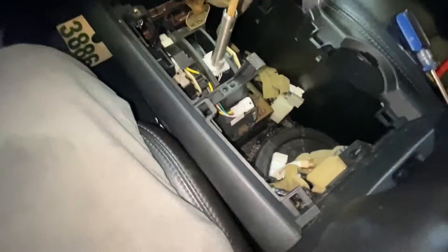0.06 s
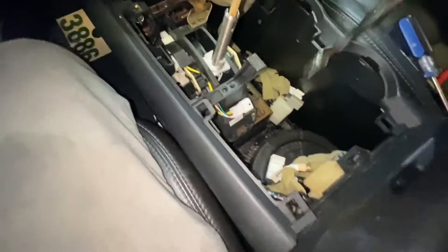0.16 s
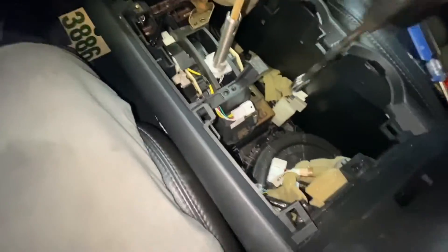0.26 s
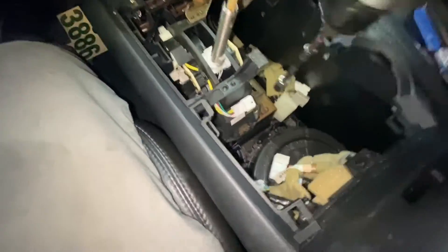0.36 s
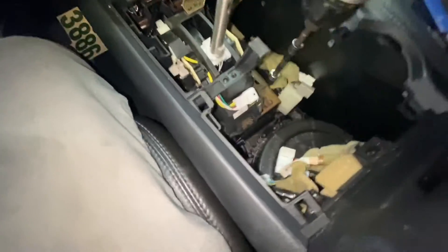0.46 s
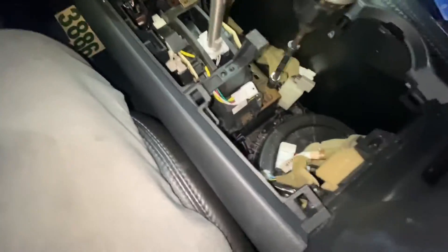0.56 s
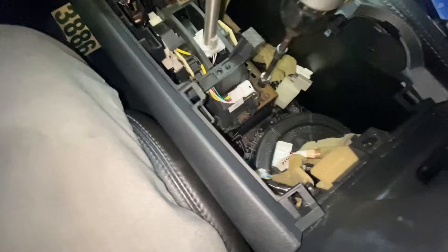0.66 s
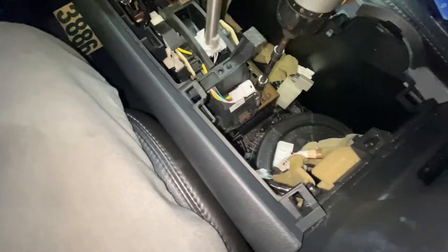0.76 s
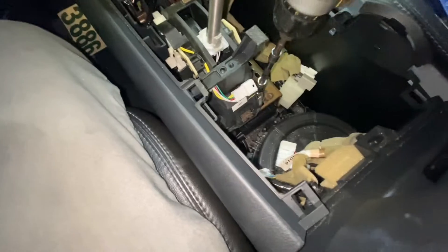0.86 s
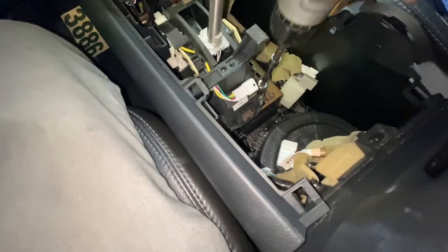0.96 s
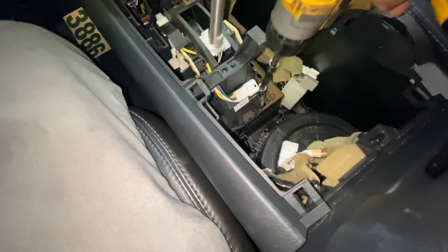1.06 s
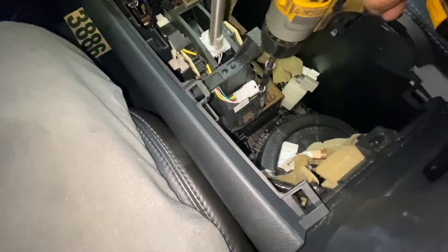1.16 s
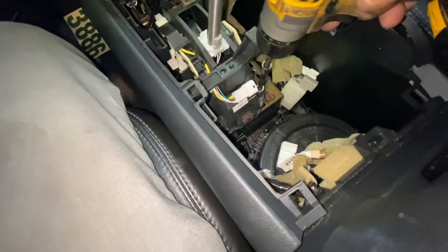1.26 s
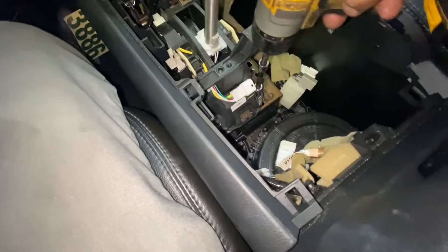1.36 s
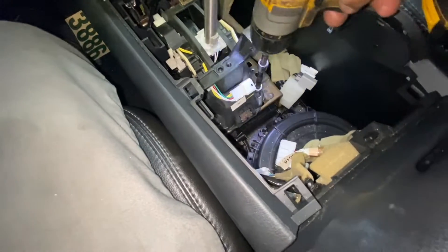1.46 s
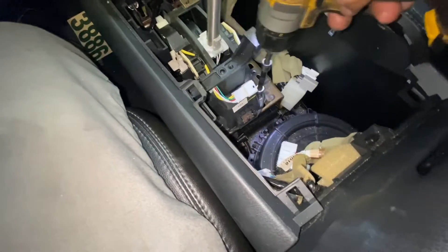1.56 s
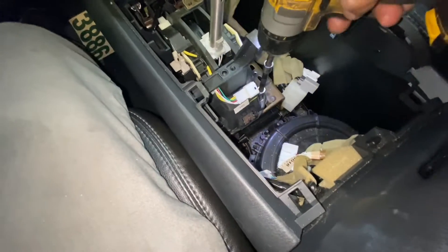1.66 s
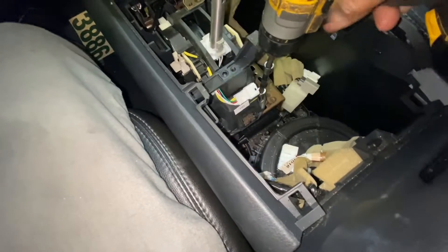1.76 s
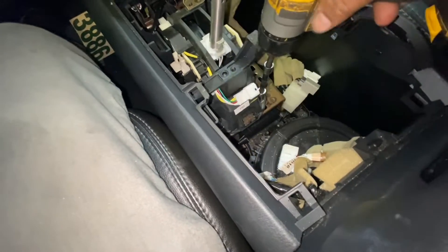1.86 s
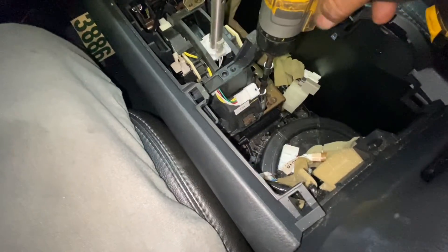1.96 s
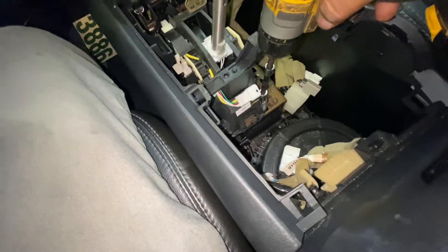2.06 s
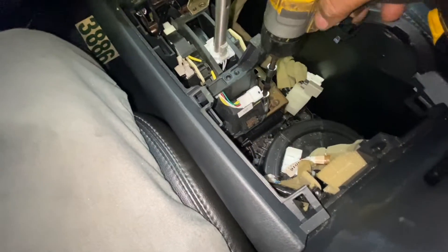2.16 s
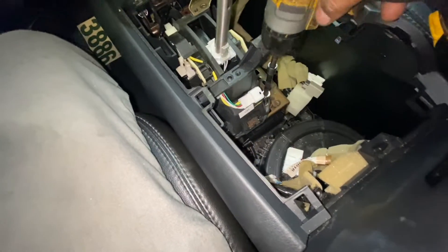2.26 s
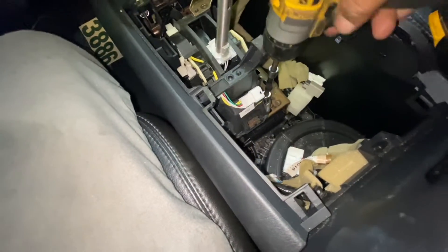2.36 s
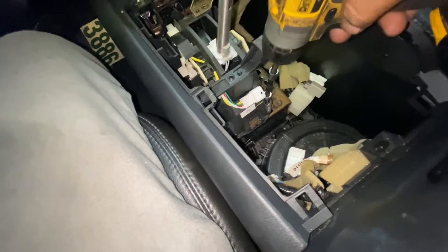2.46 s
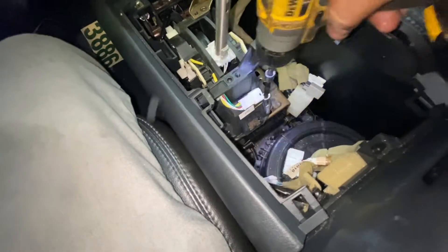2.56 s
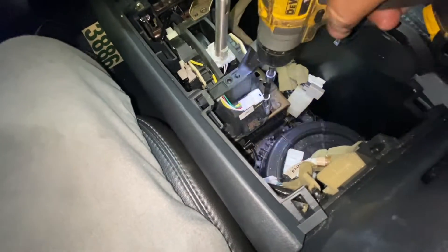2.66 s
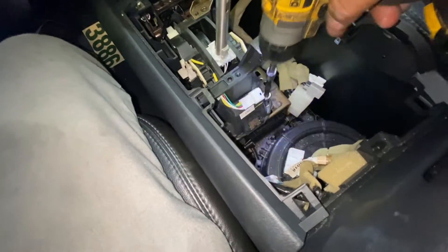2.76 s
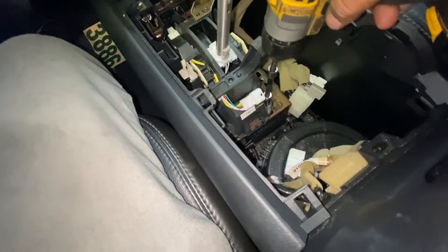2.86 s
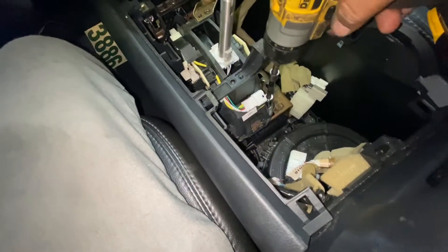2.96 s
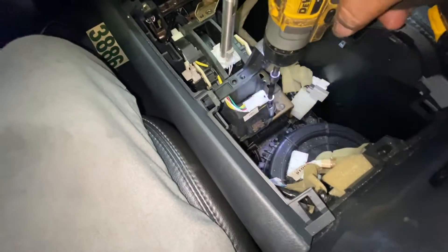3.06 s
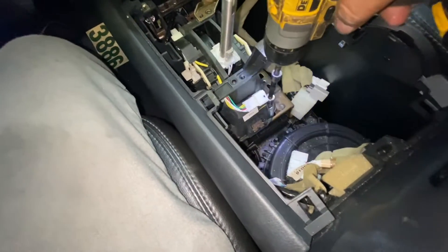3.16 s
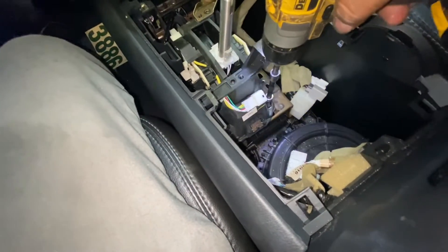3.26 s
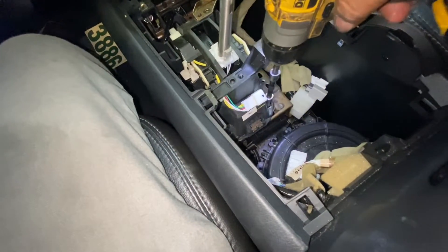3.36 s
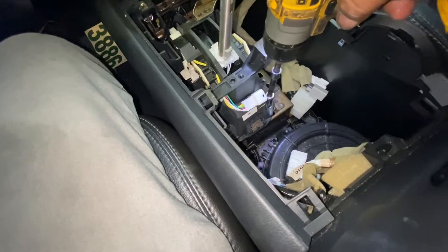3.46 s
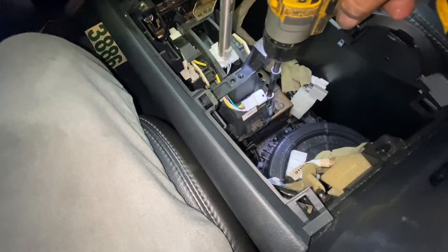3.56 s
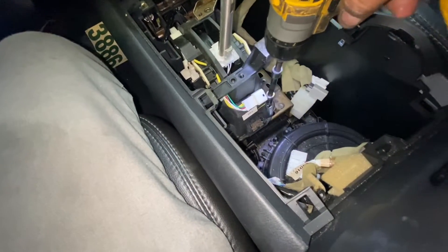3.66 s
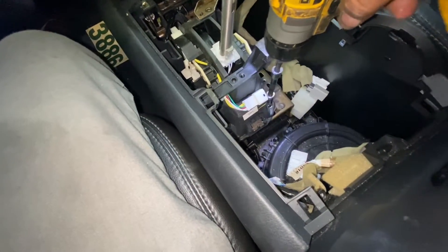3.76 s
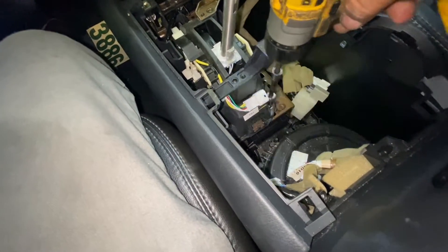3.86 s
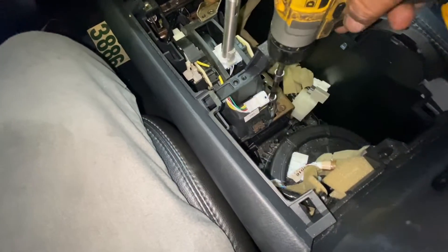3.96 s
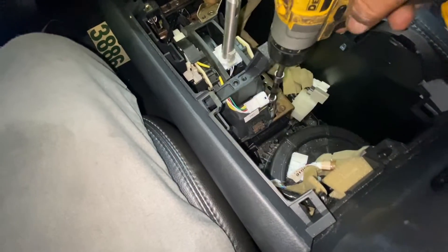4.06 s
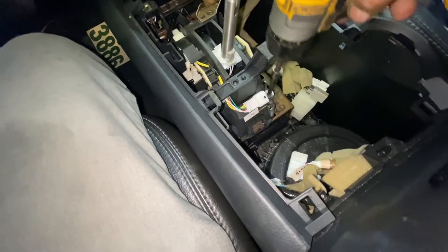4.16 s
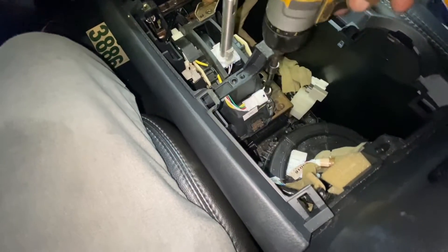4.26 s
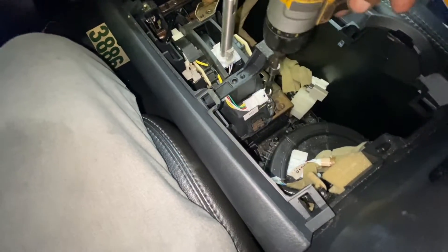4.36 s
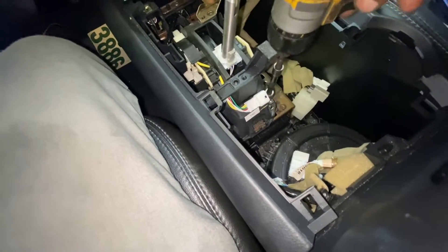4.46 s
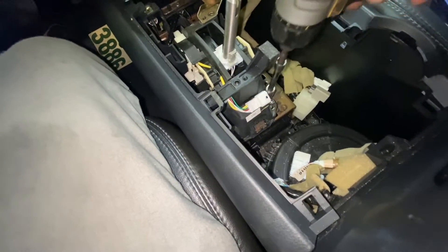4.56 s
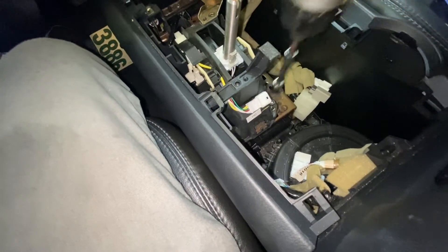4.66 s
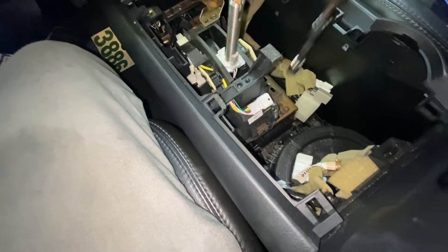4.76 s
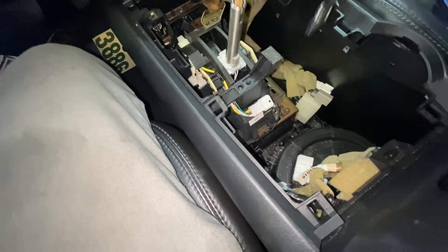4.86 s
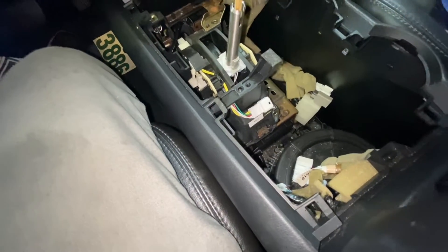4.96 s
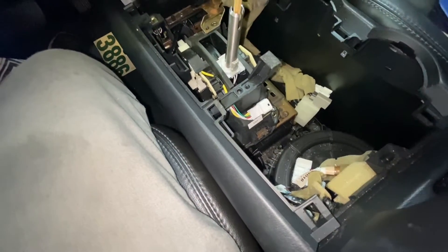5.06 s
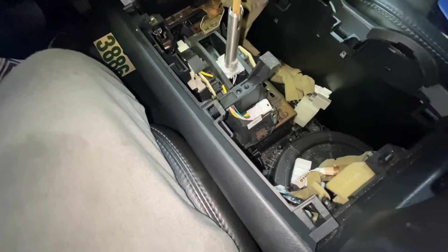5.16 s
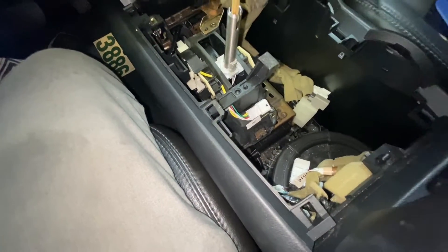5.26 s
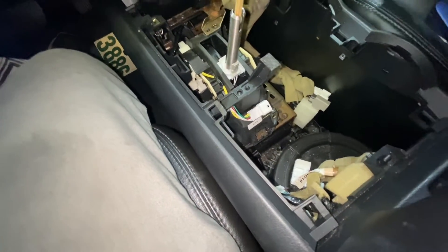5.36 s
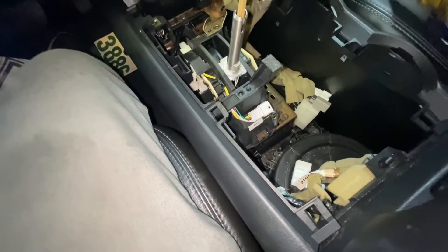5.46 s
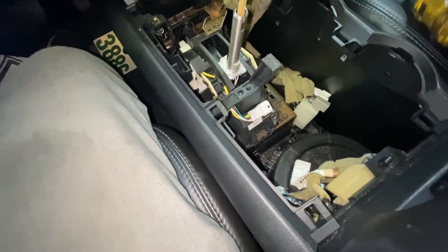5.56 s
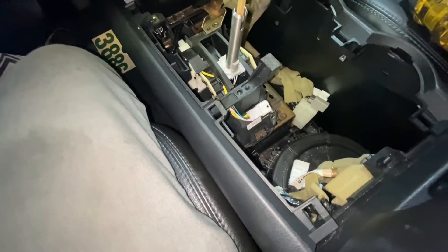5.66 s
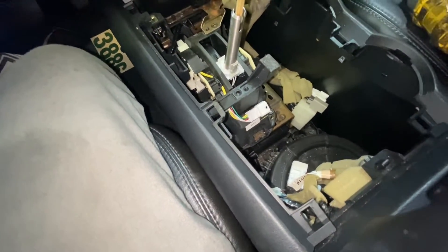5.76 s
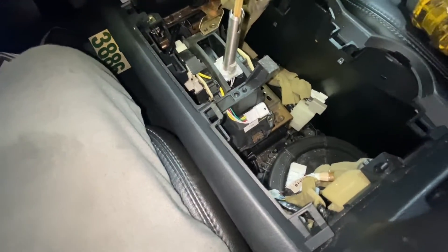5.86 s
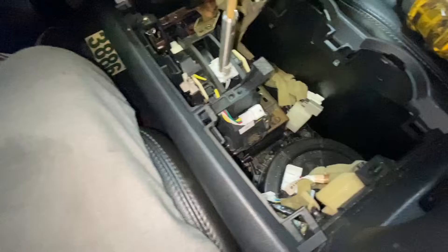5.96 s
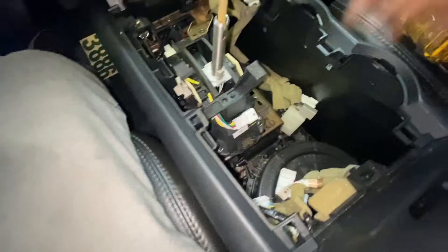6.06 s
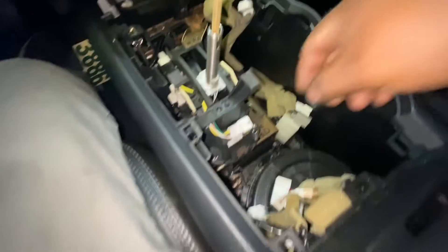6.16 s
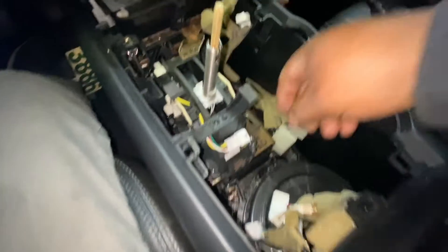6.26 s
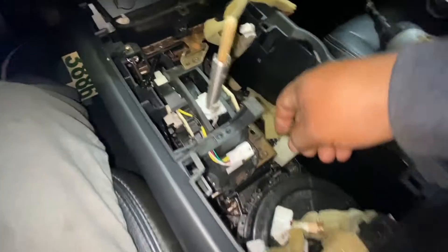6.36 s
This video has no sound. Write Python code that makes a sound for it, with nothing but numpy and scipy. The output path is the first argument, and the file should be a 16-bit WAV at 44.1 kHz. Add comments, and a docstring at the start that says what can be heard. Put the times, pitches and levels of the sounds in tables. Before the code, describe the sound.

A cordless impact driver clinks onto a bolt, rattles in two short bursts, then whines as it spins the bolt out inside a car.

```python
"""Inside a dead-sounding car cabin, close to the opened centre console, a cordless impact driver undoes
a bolt. The socket clinks onto the head, the hammer rattles in two bursts, then the motor
whines and spins the loose bolt out. The console thuds under the tool and the car's body booms;
small taps and the rustle of sliding clothes fill the pauses."""
import sys
import numpy as np
from scipy import signal
from scipy.fft import rfft, irfft
from scipy.io import wavfile
from scipy.ndimage import uniform_filter1d

SR = 44100
rng = np.random.default_rng(int(sys.argv[2]) if len(sys.argv) > 2 else 0)


def file_out(sig):
    """Save sig as 16-bit WAV at sys.argv[1]."""
    # one column per channel
    cols = np.atleast_2d(sig).T
    # limit, then scale
    lim = np.clip(cols, -1, 1)
    pcm = np.round(lim * 32767).astype(np.int16)
    wavfile.write(sys.argv[1], SR, pcm)


N = 283122
TIME, FREQS = np.arange(N) / SR, np.fft.rfftfreq(N, 1 / SR)

# Table levels are relative: each layer adds its own trim. Pan is left minus right.
# trigger pulls: start/s, release/s, top speed/(turns/s), gear level/dB, console shake/dB
PULLS = [(1.47, 1.665, 220, -37.5, -25), (2.49, 2.748, 232, -35.5, -29), (3.025, 3.811, 268.2, -28, -23.5)]
# the loose bolt jumps its last thread once a turn: t/s, grind/dB, thud/dB, thud centre/Hz
SKIPS = [(3.648, -24, -10.5, 300), (3.722, -27, -13, 200), (3.797, -24.5, -12, 182)]
# the tool bumps the console: t/s, level/dB, centre/Hz
THUDS = [(0.067, -37, 280), (0.993, -13.5, 293), (1.034, -10, 247), (1.052, -22.5, 170),
         (1.143, -26, 179.6), (1.296, -43, 255), (1.378, -34.5, 300), (1.45, -6.5, 258), (1.456, -5.5, 185),
         (1.91, -34.5, 198), (2.16, -37.5, 187), (2.294, -24.5, 258), (2.326, -25, 150), (2.533, -13, 238),
         (2.744, -26, 125), (2.874, -29.5, 123), (3.632, -12.5, 357), (3.975, -31, 130),
         (4.149, -25.5, 585), (4.466, -44.5, 494), (5.272, -61, 560), (5.588, -29.5, 550),
         (5.596, -40, 110), (5.775, -32.5, 150), (5.81, -37.5, 150), (6.368, -40, 280)]
# sleeves and trousers slide: start/s, peak/s, end/s, cloth level/dB, rub on the console/dB
RUSTLES = [(-0.5, 0.133, 0.86, -53, -46), (0.52, 0.72, 1.65, -69.5, -54.5), (0.936, 1.21, 1.43, -62, -59.5),
           (1.5, 1.8, 2.09, -68.5, -44), (2.05, 2.324, 2.43, -62.5, -44), (2.7, 2.919, 3.03, -66, -44),
           (3.926, 4.095, 4.32, -65, -47.5), (5.234, 5.484, 5.75, -60.5, -52),
           (5.75, 5.997, 6.31, -57.5, -54.5)]
# stereo image of the running tool: f/Hz, left-right correlation
TOOL_CORRELATION = [(60, 0.11), (130, 0.9), (290, 0.92), (640, 0.28), (1410, -0.31), (3100, 0.17),
                    (6820, 0.17), (15000, 1)]


def hammer():
    """Each blow cracks in the steel and kicks the console; all take a similar path to the ear."""
    # two bursts that gather pace, then slacken as the bolt gives; each: t/s, rate/(blows/s), level/dB
    bursts = [
        [(1.497, 54, -14), (1.53, 52, -12), (1.58, 118, -11), (1.63, 124, -11.5), (1.675, 57, -18)],
        [(2.501, 78, -20), (2.514, 82, -10), (2.55, 132, -9.5), (2.61, 143, -14.5), (2.651, 112, -16.5)],
    ]
    # colour of the crack: f/Hz, level/dB
    colour = [(200, -25.5), (450, -4.5), (700, -2), (1100, -1), (1600, 0.5), (2300, 2), (3400, -6.5),
              (5000, -1), (7000, -5.5), (10500, -5.5), (13000, -15), (15800, -13)]
    # its place in the image: f/Hz, pan/dB
    pan = [(60, -3.5), (110, -2.5), (200, 4.5), (380, -1), (700, 7), (1290, -0.5), (2380, 2.5), (4400, 5),
           (8120, 0.5), (15000, -1)]
    burst_tilts, lug_tilt = (-1.0, 0.86), 0.54  # dB/octave; the two lugs strike duller, then brighter
    out = np.zeros((2, N))
    path = rng.standard_normal((2, 2, 8192))
    for burst, burst_tilt in zip(bursts, burst_tilts):
        times, rate, force_db = np.transpose(burst)
        t = np.arange(times[0], times[-1], 1 / SR)
        blows_so_far = np.floor(np.cumsum(np.interp(t, times, rate)) / SR)
        for k, onset in enumerate(t[np.diff(blows_so_far, prepend=-1) > 0]):
            late, harder, brighter = rng.standard_normal(3)
            db = np.interp(onset, times, force_db) + .7 * harder
            tilt = burst_tilt - lug_tilt * (-1) ** k + 1.2 * brighter
            grit = path + 1.14 * rng.standard_normal(path.shape)
            crack = strike(colour, pan, grit, tilt, arch=0, contact_s=.00138, snap=0.31,
                           tail_db=1.0, tail_t60=0.064, tail_hz=5170)
            add(out, onset + .0004 * late, amp(db + 0.77) * crack)
            add(out, onset, amp(db - 8.0) * thud(250, focus_db=7.0, scatter=0.73))
    return out


def strike(colour, pan, grit, tilt, arch, contact_s, snap, tail_db, tail_t60, tail_hz):
    """One metal contact: a snap, a brief chatter and a duller cabin tail, through the ringing parts."""
    # resonances of socket, bracket and console hollow: f/Hz, width/Hz, boost/dB
    resonances = [(480, 30, 6), (835, 38, 4), (1100, 48, 4), (1302, 35, 3), (1640, 50, 5), (1850, 40, 3),
                  (2235, 55, 5), (2330, 70, 5), (2488, 50, 4), (2750, 45, 3), (4000, 70, 3), (5030, 180, 6),
                  (5800, 90, 3)]
    size = grit.shape[-1]
    t, hz = np.arange(size) / SR, np.fft.rfftfreq(size, 1 / SR)
    chatter = unit_rms(grit[0] * np.exp(-t / contact_s) * (1 - np.exp(-t / .0004)))
    click = unit_rms(np.array([signal.unit_impulse(size, 30), signal.unit_impulse(size, 8)]))
    tail = unit_rms(grit[1] * amp(-60 * t / tail_t60) * (1 - np.exp(-t / 0.0016)))
    blow = rfft(chatter + snap * click) + amp(tail_db) * rfft(tail) / (1 + 1j * hz / tail_hz)
    rings = 1 + sum((amp(db) - 1) / (1 + 2j * (hz - f) / width) for f, width, db in resonances)
    octaves = np.log2(np.clip(hz, 600, 10000) / 3000)
    eq = amp(curve(colour, hz) + tilt * octaves - arch * octaves ** 2) * pan_gains(curve(pan, hz))
    # minimum phase keeps the attack free of pre-ring
    log_eq = np.log(np.hstack([eq, eq[:, -2:0:-1]]))
    causal_eq = np.exp(np.conj(signal.hilbert(log_eq)))[:, :len(hz)]
    sound = irfft(blow * rings * causal_eq, size) * (1 - (t / t[-1]) ** 2)
    peak_power = uniform_filter1d((sound ** 2).mean(0), size=88).max()  # loudest 2 ms
    return sound / np.sqrt(peak_power)


def windings(drive_hz=4000):
    """As the trigger is eased in, the pulse-width drive makes the windings sing an octave pair."""
    # light squeezes ahead of the bursts: start/s, end/s, level/dB
    squeezes = [(1.362, 1.467, -46), (2.456, 2.491, -55)]
    gate = sum(ramp(start, end, db, db - 0.5) for start, end, db in squeezes)
    phase = 2 * np.pi * np.cumsum(drive_hz * (1 + .005 * drift(200))) / SR
    return gate * amp(2.5 * drift(60)) * (np.sin(2 * phase) + 0.62 * np.sin(phase))


def whine():
    """Fan and gear teeth sing at multiples of the shaft speed, filtered by the motor's housing."""
    # partials at full speed: multiple of shaft speed, level/dB
    partials = [(1, -37), (3, -45), (9, -46), (17, -49), (20, -37), (23, -41), (29, -44), (30, -44),
                (31, -36), (32, -43), (33, -44), (34, -38), (35, -43), (36, -43), (37, -35), (38, -41),
                (39, -33), (40, -35), (41, -46), (42, -38), (43, -40), (44, -43), (45, -43), (47, -44),
                (51, -44), (52, -40)]
    # what the housing lets through: f/Hz, level/dB
    housing = [(6200, 0), (7200, -12), (9300, -12), (9880, 0), (10700, 0), (11400, -8), (12200, -13),
               (14000, -11)]
    speed = shaft_speed()
    turns = np.cumsum(speed * (1 + .0009 * drift(70))) / SR
    out = np.zeros((2, N))
    for order, db in partials:
        offset = rng.random() + .08 * rng.standard_normal((2, 1))
        gain = amp(db + curve(housing, order * speed) + 1.8 * drift(30))
        out += gain * np.sin(2 * np.pi * (order * turns + offset))
    return amp(-0.5) * out * (speed / speed.max()) ** 6


def gears():
    """Gear hiss pulses with each turn; the thread grinds as the socket wobbles, hardest at a skip."""
    # colour of the hiss: f/Hz, level/dB
    colour = [(450, -20), (620, 3), (900, -4), (1300, -1), (1700, -4), (2400, -1), (3300, -8), (5000, -4),
              (6000, 1), (7300, -10), (9300, -10), (10500, -4), (14800, -11), (15800, -30)]
    # its place in the image: f/Hz, pan/dB
    pan = [(60, 2), (110, 10), (200, -1), (380, 2.5), (700, 8), (1290, 0), (2380, 2), (4400, 12.5),
           (8120, -2.5), (15000, 0)]
    # how far the left side leads: f/Hz, phase/rad
    lead = [(0, 0.5), (520, 0.5), (780, 2), (1210, 3), (2240, 8.5), (3880, 2.5), (5940, 15), (7240, 15),
            (8350, 14), (9040, 11.9), (10200, 10.5), (15900, 3.5)]
    # colour of the grinding thread: f/Hz, level/dB
    thread_colour = [(300, -25), (600, -6), (1200, 5), (2400, -6), (3300, -5), (6000, -17.5),
                     (12000, -37)]
    turns = np.cumsum(shaft_speed()) / SR
    running = sum(amp(db) * run_gain(start, release) for start, release, _, db, _ in PULLS)
    skipping = sum(amp(db) * bump(onset, half_s=0.019) for onset, db, *_ in SKIPS)
    grinding = amp(-9.0) * running * wobble(2.8) + skipping
    teeth = (1 + .2 * np.cos(2 * np.pi * turns)) * amp(drift(120))
    hiss = wobble(.5) * noise(colour, pan, grain=teeth, correlation=TOOL_CORRELATION, lead=lead)
    thread = noise(thread_colour, grain=amp(5.7 * drift(210)))
    return panels(running * hiss + amp(-2.0) * grinding * thread, echo_db=-3)


def throttle(start, release, kick_s=.014, creep_s=.068, ease_s=.11, brake_s=.045):
    """Share of top speed: the motor kicks, creeps up, slows as the finger eases, then brakes."""
    t = np.maximum(TIME - start, 0)
    spin_up = (1 - np.exp(-t / kick_s)) * (1 - .52 * np.exp(-t / creep_s))
    easing = 1 - .09 * np.clip(1 + (TIME - release) / ease_s, 0, 1)
    braking = np.exp(-(np.maximum(TIME - release, 0) / brake_s) ** 2)
    return spin_up * easing * braking


def run_gain(start, release, full_share=0.83):
    """The tool grows louder through a pull until it reaches full_share of its top speed."""
    return np.minimum(throttle(start, release) / full_share, 1) ** 2


def shaft_speed(sag=0.036, sag_s=0.024):
    """Motor turns a second; each skip of the thread drags the speed down."""
    drag = sag * sum(bump(onset + sag_s / 2, sag_s) for onset, *_ in SKIPS)
    return (1 - drag) * sum(top * throttle(start, release) for start, release, top, *_ in PULLS)


def wobble(depth_db, gear_ratio=22):
    """The socket runs out of true: a gain that crests once a turn, lined up with the first skip."""
    turns = np.cumsum(shaft_speed()) / SR / gear_ratio
    first_skip = np.interp(SKIPS[0][0], TIME, turns)
    return amp(depth_db * np.cos(2 * np.pi * (turns - first_skip)))


def clinks():
    """Socket, bolt and tools make single contacts, steel on steel and on plastic."""
    # contacts: t/s, level/dB, tilt/(dB/octave), spectral arch/(dB/octave^2), pan/dB
    contacts = [(0.013, -28, 3.5, -1.5, 5), (0.069, -32, 1, -2.5, 9), (0.213, -35.5, -1, 0.5, 18),
                (0.326, -32.5, 4.5, -2, 9), (0.386, -28.5, 2.5, -2.5, 5.5), (0.459, -29, 0.5, 0.5, 7),
                (0.634, -30.5, -4.5, 3, 8), (0.663, -28, 1.5, 2.5, 6), (0.74, -41, -0.2, 1.5, 14),
                (0.914, -38.5, -10, 0.5, 4), (0.937, -18, 11.5, 3, 2), (0.944, -21.5, 2.5, -1, 4),
                (0.984, -15.5, 2.5, -1, 0), (0.988, -14.5, 5.5, 0, 2), (0.995, -11.5, 3.5, -1.2, 6),
                (1.014, -33, 2, -8, 16), (1.029, -20, -0.5, -2, 5), (1.365, -44, 0.5, -2, 4),
                (1.4479, -6.5, 5.5, -3.5, 1), (1.4511, -11.5, -0.5, 1.5, 3.5), (2.039, -46, -2.5, 1.5, 8),
                (2.296, -26, -2.5, -0.5, 5.5), (2.491, -29, -5.5, 0, 11), (2.73, -28, 1, 0.5, 4),
                (2.747, -22.5, -11.5, 3.5, 3.5), (2.989, -46, 3, -3, 0.5), (3.034, -35, -4.5, 0.5, 1.5),
                (3.776, -17.5, 2.5, 1.5, 8), (3.97, -44, -18.5, 4, 2.5), (4.042, -37.5, 0, -1.5, 3),
                (4.056, -35, 0, -1, 3), (4.106, -35.5, 3, -2, 3), (4.148, -18, 0.5, 1.5, 3.5),
                (4.322, -32.5, -2.5, 1, 2), (4.463, -45.5, -3.9, 0.5, 5), (4.93, -50.5, -0.5, -5.5, -0.5),
                (5.268, -48.5, -2, -2.5, -0.5), (5.59, -33, -1.5, -1, 3), (6.366, -41.5, -8, 0, 3.5)]
    # colour of the steel: f/Hz, level/dB
    colour = [(200, -15.5), (450, -5.5), (750, -3.5), (1400, -3), (2400, -1), (3300, -4), (4300, -3),
              (5800, -6.5), (7500, -15), (10500, -14), (13000, -37.5), (15800, -29.5)]
    out = np.zeros((2, N))
    for onset, db, tilt, arch, pan_db in contacts:
        grit = rng.standard_normal((2, 2, 8192))
        clink = strike(colour, [(1, pan_db)], grit, tilt, arch, contact_s=.0051, snap=0.6,
                       tail_db=2.5, tail_t60=0.094, tail_hz=2870)
        add(out, onset, amp(db - 1.54) * clink)
    return out


def gritty_hisses(swell_db=15):
    """Short gritty hisses swell into the clinks and the second hammer burst."""
    # swells: start/s, end/s, final level/dB
    swells = [(0.42, 0.456, -36.5), (0.978, 0.999, -23), (1.013, 1.034, -26), (1.398, 1.455, -33),
              (2.237, 2.3, -42.5), (2.471, 2.515, -30)]
    # colour of the hiss: f/Hz, level/dB
    colour = [(300, -8), (900, 2.5), (2400, -4), (4500, -2.5), (8000, -12.5), (15000, -21.5)]
    envelope = sum(ramp(start, end, db - swell_db, db) for start, end, db in swells)
    return envelope * noise(colour, grain=amp(4.0 * drift(900)))


def console():
    """The console thuds, and rumbles with the running tool, rubbing sleeves and shaken loose trim."""
    # colour of the rumble: f/Hz, level/dB
    colour = [(24, -49.5), (40, -14), (65, -6), (92, 2), (155, -5), (275, -3), (309, -9), (391, -6),
              (428, -19), (488, -2.5), (534, -14.5), (900, -20), (1170, -53), (1980, -120)]
    running = wobble(2.2) * sum(amp(db - .5) * run_gain(start, stop) for start, stop, *_, db in PULLS)
    skipping = sum(amp(db - 9.5) * bump(onset + 0.0033, half_s=0.027) for onset, _, db, _ in SKIPS)
    loose_trim = amp(-13) * aftershock(rise_s=.005, t60=0.2, compression=.75, below_hz=280)
    rumble = noise(colour, grain=amp(1.5 * drift(100)), correlation=TOOL_CORRELATION)
    out = amp(-5.0) * (running + skipping + rubbing() + loose_trim) * rumble
    for onset, *_, db, centre_hz in THUDS + SKIPS:
        add(out, onset, amp(db - 3.0) * thud(centre_hz, focus_db=9.5, scatter=1.3))
    return out


def thud(centre_hz, focus_db, scatter, size=12000):
    """The console's modes ring around centre_hz: low for a soft push, high for a hard knock."""
    # modes of console and bracket: f/Hz, level/dB, t60/s
    modes = [(96.9, -2.5, 0.31), (122, -7.5, .14), (186, -7, 0.074), (213.2, -1, 0.091),
             (266.4, -1.5, 0.082), (284.4, -3.5, .12), (350.8, -2.5, .09), (398.5, -6, 0.055),
             (475.6, -6.5, 0.074), (555.7, -2, 0.11)]
    t = np.arange(size) / SR
    hz, db, t60 = np.transpose(modes)[:, :, None]
    louder, offset, spread = rng.standard_normal((3, len(modes), 1))
    weight_db = db - focus_db * np.log2(hz / centre_hz) ** 2 + 1.2 * louder
    # higher modes spread wider in stereo
    phase = scatter * offset + np.array([-1, 1])[:, None, None] * spread * (hz / 700) ** 2
    ringing = amp(weight_db - 60 * t / t60) * np.sin(2 * np.pi * hz * t + phase)
    sound = ringing.sum(1) * (1 - np.exp(-t / 0.0024))
    return sound / abs(sound).max()


def aftershock(rise_s, t60, compression, below_hz):
    """Envelope of what the thuds set shaking: dull ones most, light ones more than in proportion."""
    power = np.zeros(N)
    for onset, db, centre_hz in THUDS:
        t = np.maximum(TIME - onset, 0)
        shake = amp(compression * db - 60 * t / t60) * (1 - np.exp(-t / rise_s))
        power += (shake / (1 + (centre_hz / below_hz) ** 2)) ** 2
    return np.sqrt(power)


def clothes(catches_per_s=19, catch_db=7, catch_s=.0015):
    """Fabric slides in tiny slips and threads catch now and then; sleeves brighten as they near."""
    # colour of the cloth: f/Hz, level/dB
    colour = [(180, -31.5), (300, -3), (409, -11), (467, -4.5), (928, -5), (2400, -5.5), (3270, -13.5),
              (4180, -9), (7300, -22.5), (9640, -20), (15000, -50)]
    # sleeves sweeping by: start/s, peak/s, end/s, level/dB, first centre/Hz, last centre/Hz
    passes = [(4.805, 5.046, 5.16, -56.5, 1400, 1900), (5.77, 5.918, 6.2, -53.5, 1210, 2370),
              (5.9, 6.146, 6.53, -55.5, 3840, 4680)]
    moving = sum(amp(db) * swell(start, peak, end) for start, peak, end, db, _ in RUSTLES)
    snags = (rng.random(N) < catches_per_s / SR) * amp(catch_db + 3 * rng.standard_normal(N))
    catches = signal.lfilter([1], [1, -np.exp(-1 / (catch_s * SR))], snags)
    slips = amp(1.4 * drift(400) + 1.8 * drift(19))
    out = amp(6.5) * moving * noise(colour, grain=slips + catches)
    fibres = noise([(400, -20), (1000, 1.5), (7000, 2), (14000, -10)])
    for start, peak, end, db, *centres_hz in passes:
        swish = resonate(fibres, np.interp(TIME, [start, end], centres_hz), width_hz=910)
        out += amp(db) * swell(start, peak, end) * unit_rms(swish)
    return panels(out, echo_db=-5.5)


def rubbing():
    """Envelope of the clothes rubbing on the console."""
    return sum(amp(db) * swell(start, peak, end) for start, peak, end, _, db in RUSTLES)


def after_hum(start_s=3.8, hz=98.5, db=-45, t60=4.3):
    """A low hum lingers in the car's body once the tool stops."""
    t = np.maximum(TIME - start_s, 0)
    return amp(db - 60 * t / t60) * np.sin(2 * np.pi * hz * t)


def cabin():
    """A bed of low rumble and faint hiss; the car's body booms with thuds, motor and movement."""
    # colour of the room tone: f/Hz, level/dB
    colour = [(20, -17), (36, -6.5), (55, 1), (72, -9), (97, -8.5), (130, -14), (300, -19), (420, -20),
              (700, -26), (2000, -26.5), (4200, -36.5), (5500, -43), (10000, -48), (15000, -79)]
    # colour of the body's boom: f/Hz, level/dB
    boom_colour = [(20, -29.5), (38, -6.5), (53, 4), (64, -8), (80, -24), (160, -66)]
    rocking = amp(-22.5) * aftershock(rise_s=.012, t60=0.56, compression=0.64, below_hz=360)
    running = amp(-44) * shaft_speed() / PULLS[-1][2]
    boom = (amp(-57.5) + rocking + running + amp(-3.5) * rubbing()) * noise(boom_colour)
    room_tone = amp(-54.5) * noise(colour) * amp(0.42 * drift(3.9))
    return room_tone + amp(-2.5) * boom


def panels(x, echo_db, count=8):
    """Close plastic panels throw the treble back within a few milliseconds."""
    delays_s = rng.uniform(.001, .012, (count, 2, 1))
    echoes = sum((-1) ** k * np.exp(-2j * np.pi * FREQS * delay) for k, delay in enumerate(delays_s))
    low_cut = FREQS / (FREQS + 500)
    return irfft(rfft(x) * (1 + amp(echo_db) * echoes / np.sqrt(count) * low_cut), N)


def noise(colour, pan=((1, 0),), grain=1, correlation=None, lead=((1, 0),)):
    """Coloured stereo noise at rms 1; grain roughens it ahead of the colour."""
    # default image, narrow bass and wide treble: f/Hz, left-right correlation
    narrow_bass = [(40, .75), (130, 0.59), (300, 0.88), (650, 0), (1400, 0), (15000, 0.0055)]
    left, other = rfft(rng.standard_normal((2, N)) * grain)
    alike = np.clip(curve(correlation or narrow_bass, FREQS), -1, 1)
    right = alike * left * np.exp(-1j * curve(lead, FREQS)) + np.sqrt(1 - alike ** 2) * other
    eq = amp(curve(colour, FREQS)) * pan_gains(curve(pan, FREQS))
    return unit_rms(irfft(np.array([left, right]) * eq, N))


def resonate(x, hz, width_hz):
    """A resonance that glides along hz."""
    carrier = np.exp(2j * np.pi * np.cumsum(hz) / SR)
    pole = np.exp(-np.pi * width_hz / SR)
    return 2 * (carrier * signal.lfilter([1 - pole], [1, -pole], x / carrier)).real


def drift(rate_hz):
    """Smooth random modulation up to rate_hz, at rms 1."""
    return unit_rms(irfft(rfft(rng.standard_normal(N)) / (1 + (FREQS / rate_hz) ** 4), N))


def swell(start, peak, end, depth_db=21.5):
    """Envelope of one movement, depth_db below its peak at start and end."""
    before = (peak - TIME) / max(peak - start, .01)
    after = (TIME - peak) / max(end - peak, .01)
    return amp(-depth_db * np.maximum(before, after) ** 2)


def bump(centre_s, half_s):
    """A brief bell-shaped envelope."""
    return np.exp(-((TIME - centre_s) / half_s) ** 2)


def ramp(start, end, start_db, end_db):
    """A soft-edged fade between two levels, silent outside."""
    db = np.interp(TIME, [start, end], [start_db, end_db], left=-120, right=-120)
    return uniform_filter1d(amp(db), 200)


def curve(points, hz):
    """Reads a table on a log-frequency axis."""
    f, value = np.transpose(points)
    return np.interp(np.log(hz + 1), np.log(f + 1), value)


def pan_gains(pan_db):
    """Constant-power left and right gains for a level difference."""
    pair = amp(np.array([[.5], [-.5]]) * pan_db)
    return pair / np.sqrt(np.mean(pair ** 2, 0))


def add(mix, onset, sound):
    """Lays a stereo sound into the mix at onset seconds."""
    part = mix[:, max(round(onset * SR), 0):][:, :sound.shape[1]]
    part += sound[:, :part.shape[1]]


def amp(db):
    """Decibels to gain."""
    return 10 ** (np.asarray(db) / 20)


def unit_rms(x):
    """Scales to rms 1."""
    return x / np.sqrt(np.mean(x ** 2) + 1e-20)


def scene():
    """The tool up front, the console under it, clothes and cabin behind."""
    motor = windings() + whine() + gears()
    tool = motor + hammer() + clinks() + gritty_hisses()
    return tool + console() + after_hum() + clothes() + cabin()


def record(dry):
    """The microphone sheds the deepest bass, peaks clip at full scale, and the very top is cut."""
    low_cut = signal.butter(2, 34, "highpass", fs=SR, output="sos")
    high_cut = signal.firwin(255, 15900, window=("kaiser", 9), fs=SR)
    clipped = np.clip(signal.sosfilt(low_cut, dry), -1, 1)
    return signal.oaconvolve(clipped, high_cut[None], "same")


dry = scene()
out = record(dry)
file_out(out)
```